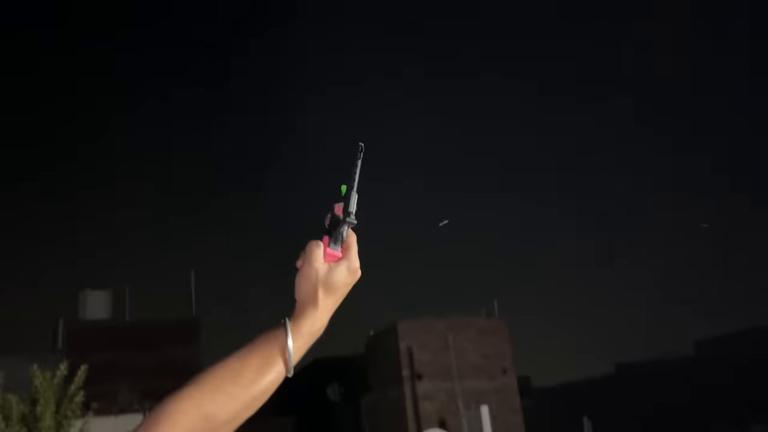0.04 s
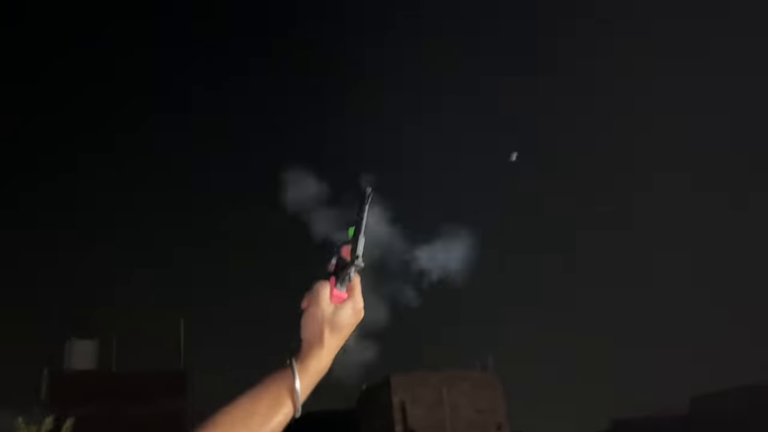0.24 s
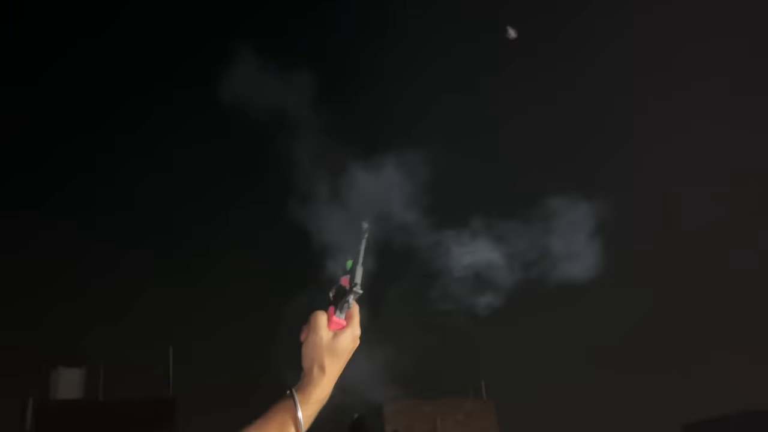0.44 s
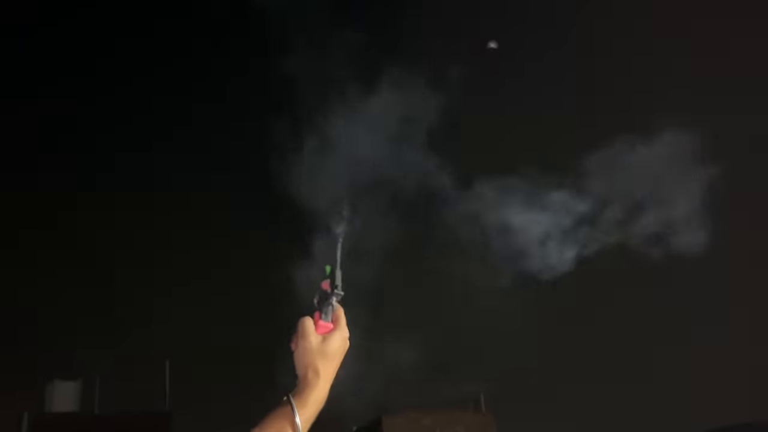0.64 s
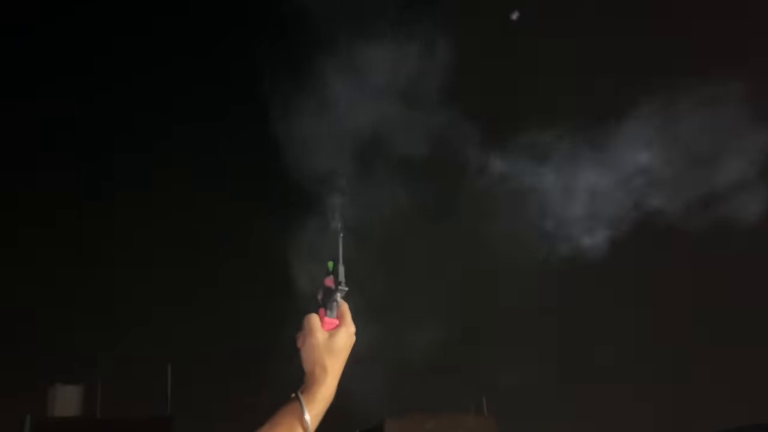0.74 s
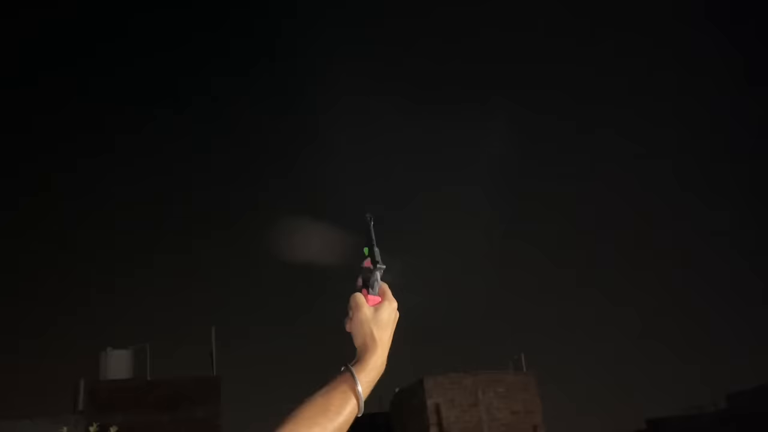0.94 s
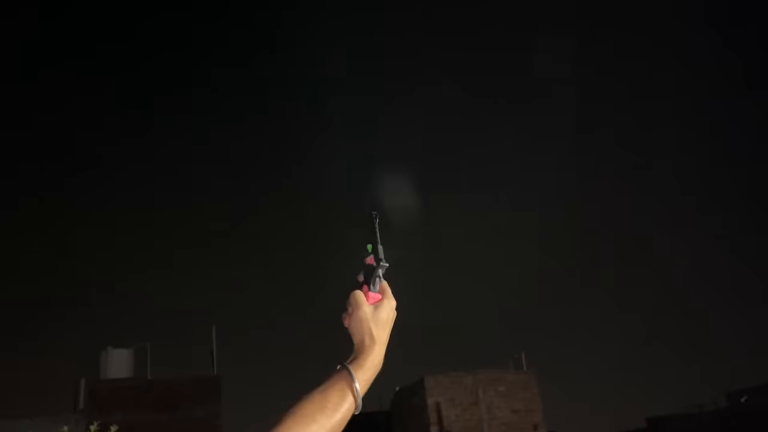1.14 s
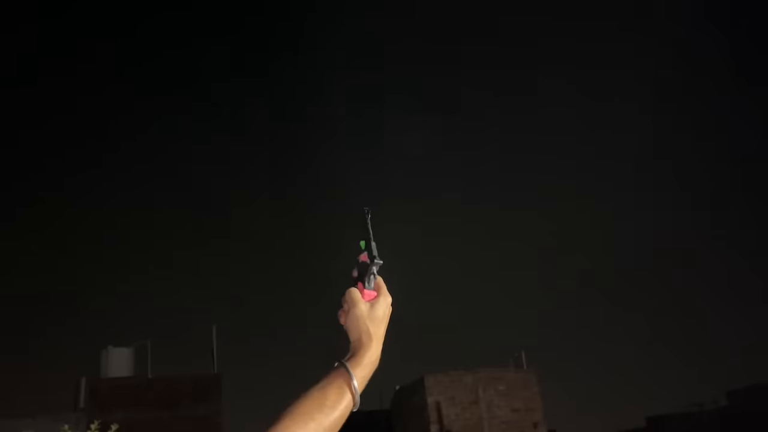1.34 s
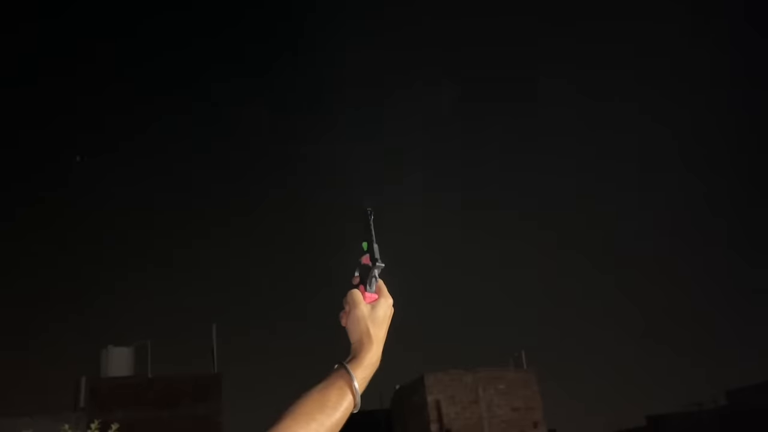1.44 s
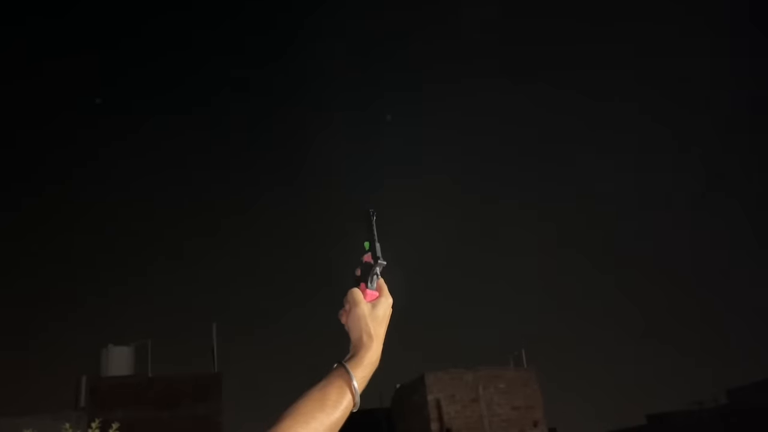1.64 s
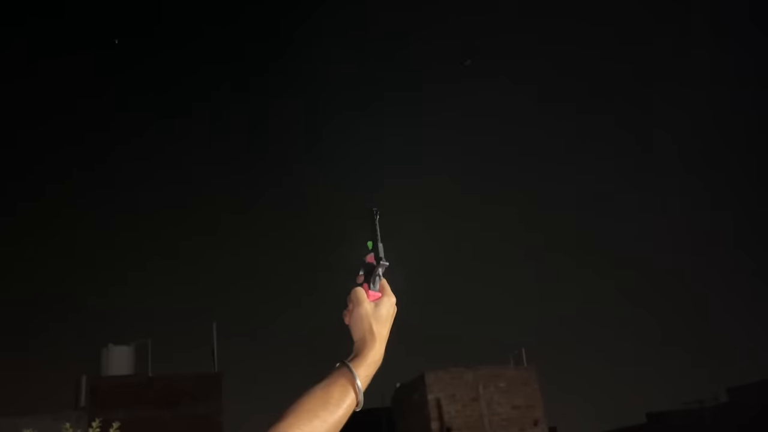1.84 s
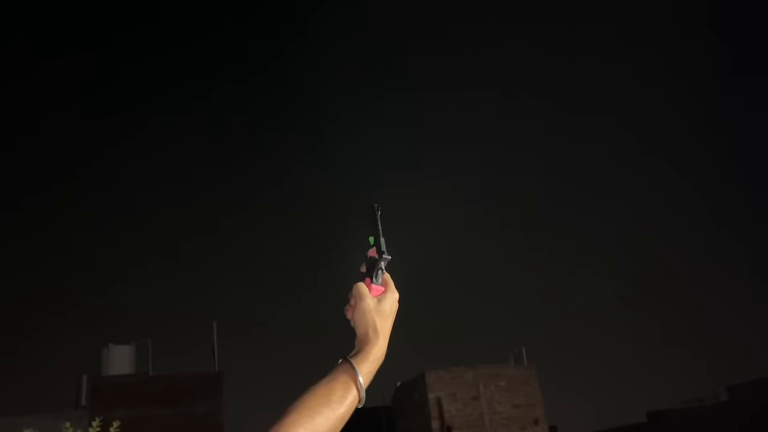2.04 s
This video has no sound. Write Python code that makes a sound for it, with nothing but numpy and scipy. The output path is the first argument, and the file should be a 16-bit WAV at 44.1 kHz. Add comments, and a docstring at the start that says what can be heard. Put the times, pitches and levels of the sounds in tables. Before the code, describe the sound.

A toy cap gun fires one very loud crack after a brief soft hiss, echoes scatter off houses, then the hammer rattles softly, the trigger ticks and two dry snaps follow; close microphone, faint street rumble.

```python
"""A soft hiss fades, then a toy cap gun held up over rooftops at night fires one cap that echoes off the houses.
The hammer is let down softly, then snaps on spent caps, with trigger ticks around it; a street rumbles far below.
Noise bursts, struck body tones and decaying echo noise build the gun; coloured noise makes hiss and street.
The recorder turns its gain down at the blast and creeps back; once the sound dips briefly to near silence."""
import sys
import numpy as np
from scipy import signal
from scipy.fft import rfft, irfft, next_fast_len
from scipy.io import wavfile
from scipy.ndimage import uniform_filter1d, minimum_filter1d, map_coordinates

SR = 44100
rng = np.random.default_rng(int(sys.argv[2]) if len(sys.argv) > 2 else 0)


def volts_from_decibels(level):
    """Turn decibel levels (scalar or array-like) into linear amplitude factors."""
    exponent = np.asarray(level, float) / 20
    return 10 ** exponent


def generate_wav(signal):
    """Clip the signal to [-1, 1] and save it as 16-bit WAV at the path in sys.argv[1]."""
    frames = np.transpose(np.atleast_2d(signal))
    scaled = np.clip(frames, -1, 1) * 32767
    pcm = np.round(scaled).astype(np.int16)
    wavfile.write(sys.argv[1], SR, pcm)


N = 92610
T = np.arange(N) / SR
BLAST_S = 0.2172
# decay of the roof and nearest walls: (frequency [Hz], time to fall 60 dB [s])
NEAR_DECAY = [(500, 0.13), (2000, 0.068), (8000, 0.074), (15000, 0.11)]
# decay of the town: (frequency [Hz], time to fall 60 dB [s])
FAR_DECAY = [(500, 0.79), (2000, 0.77), (5000, 0.79), (9000, 0.6), (15000, 0.41)]


def unit(x):
    """Scale to rms 1."""
    return x / np.sqrt(np.mean(x ** 2) + 1e-20)


def along(points, hz):
    """Read a curve of (Hz, value) points on a log frequency axis."""
    f, v = np.transpose(points)
    return np.interp(np.log(hz + 1), np.log(f + 1), v)


def filtered(x, response):
    """Multiply the spectrum of x by a function of frequency."""
    m = next_fast_len(len(x) + 8192)
    spectrum = rfft(x, m) * response(np.fft.rfftfreq(m, 1 / SR))
    return irfft(spectrum, m)[:len(x)]


def coloured(tone):
    """Noise of rms 1 with the given spectrum."""
    return unit(filtered(rng.standard_normal(N), lambda f: volts_from_decibels(along(tone, f))))


def peak(f, hz, width_hz):
    """Response of one causal resonance."""
    return 1j * f * width_hz / (hz * hz - f * f + 1j * f * width_hz + 1e-9)


def burst(start, length):
    """Envelope with a quick rise, its decay 30 dB down after length."""
    t = np.clip(T - start, 0, None)
    rise_s = 0.09 * length
    return (1 - np.exp(-t / rise_s)) * volts_from_decibels(-30 * t / length)


def clicks(rows, length):
    """Short noise bursts, each through its own band."""
    out = np.zeros(N)
    for s, db, hz, width_hz in rows:
        noise = rng.standard_normal(1024) * burst(0, length)[:1024]
        click = filtered(noise, lambda f: peak(f, hz, width_hz) ** 3)
        i = round(s * SR)
        # equal energy for every click before its level
        out[i:i + 1024] += volts_from_decibels(db) * click / np.linalg.norm(click) * np.sqrt(length * SR / 20)
    return out


def pulses(rows, tone):
    """Single coloured impulses at (s, dB)."""
    x = np.zeros(N)
    for s, db in rows:
        x[round(s * SR)] = volts_from_decibels(db)
    return filtered(x, lambda f: volts_from_decibels(along(tone, f)))


def space(x, t60):
    """Diffuse echoes; each frequency dies at its own speed."""
    hz, t, z = signal.stft(rng.standard_normal(SR), SR, nperseg=256)
    decay = volts_from_decibels(-60 * t / along(t60, hz)[:, None])
    tail = signal.istft(z * decay, SR, nperseg=256)[1]
    return signal.fftconvolve(x, tail / np.linalg.norm(tail))[:N]


def street():
    """Distant traffic rumble as slightly unsteady noise, a wavering low hum and a faint thin squeak."""
    # rumble spectrum: (frequency [Hz], density [dB per Hz, relative])
    rumble_tone = [(25, -58), (52, 0.5), (145, -2.5), (906, -13.5), (1200, -12), (1370, -13.5), (1970, -24),
                   (3210, -19.5), (4060, -43.5), (12000, -74), (15600, -101), (22000, -120)]
    # hum bands: (centre [Hz], resonance width [Hz], level [dB])
    hum_bands = [(60.7, 6, -57.5), (123.5, 32, -60.5)]
    # squeak: (time [s], length [s], pitch [Hz], level [dB])
    squeaks = [(1.306, 0.31, 3150, -62)]
    level_db, wobble_db = -53, -2.5
    wobble = map_coordinates(rng.standard_normal(30), [T * 9])  # 9 random points a second
    rumble = volts_from_decibels(level_db + wobble_db * wobble) * coloured(rumble_tone)
    hum = np.zeros(N)
    for hz, width_hz, db in hum_bands:
        hum += volts_from_decibels(db) * unit(filtered(rng.standard_normal(N), lambda f: peak(f, hz, width_hz) ** 2))
    squeak = np.zeros(N)
    for s, length, hz, db in squeaks:
        swell = np.sin(np.pi * np.clip((T - s) / length, 0, 1))
        squeak += volts_from_decibels(db) * swell * np.sin(2 * np.pi * hz * T + 3 * wobble)
    return rumble + hum + squeak


def hiss():
    """A soft noise hiss that fades and stops at the blast."""
    # fade: (time [s], level [dB])
    fade = [(0.0, -39), (0.024, -47), (0.175, -55)]
    # spectrum: (frequency [Hz], density [dB per Hz, relative])
    hiss_tone = [(350, -10.5), (600, -12.5), (2070, -13), (2680, -14), (3480, -18), (9490, -23),
                 (16000, -44)]
    s, db = np.transpose(fade)
    return volts_from_decibels(np.interp(T, s, db)) * (T < BLAST_S) * coloured(hiss_tone)


def trigger():
    """Small ticks of trigger and cylinder: band-shaped noise bursts with a little near echo."""
    # ticks: (time [s], level [dB], centre [Hz], resonance width [Hz])
    tick_rows = [(1.0892, -29, 2150, 1510), (1.094, -31.5, 4620, 3140), (1.120, -39, 2090, 1500),
                 (1.161, -31.5, 3620, 3280), (1.170, -25.5, 3500, 11350), (1.329, -45, 2930, 1209),
                 (1.399, -37, 5500, 9100), (1.5352, -25.5, 2210, 1800), (1.545, -30, 3940, 3040),
                 (1.5975, -19, 4120, 11800), (1.7207, -35, 3140, 2980), (1.778, -41, 4600, 5920),
                 (1.9098, -28, 2180, 1870), (1.9787, -20, 3870, 11000), (2.0475, -39.5, 2920, 1970)]
    length_s, room_db = 0.006, -13
    ticks = clicks(tick_rows, length_s)
    return ticks + volts_from_decibels(room_db) * space(ticks, NEAR_DECAY)


def hammer(ticks):
    """Quick contacts crack and ring the plastic body; a soft fall rattles thinly; ticks ring it too."""
    # hammer falls: (time [s], level [dB])
    snaps = [(1.4162, -2.5), (1.7957, -1.5)]
    # contacts in one fall, then several later echoes off near walls:
    # (time after the fall [s], level [dB], length [s])
    contacts = [(-.0023, -22.5, 0.0049), (0, 0, 0.0079), (.0033, 1, 0.0069), (.0057, 0.5, 0.0035),
                (0.0145, -18.5, 0.0045), (0.023, -11.5, 0.014), (0.03, -19, 0.013), (.035, -17.5, 0.0078),
                (0.064, -23, 0.0082)]
    # hammer let down softly once: (time [s], level [dB], length [s])
    soft_fall = [(0.9864, -20.5, .008), (0.997, -21, 0.014), (0.997, -24.5, 0.0076), (1.03, -28, .01),
                 (1.042, -43.5, 0.0077)]
    # crack spectrum: (frequency [Hz], gain [dB])
    crack_tone = [(400, -53), (700, -19.5), (1040, 1.5), (1650, -9.5), (3420, 3.5), (3750, 1), (5190, 4.5),
                  (6340, -4), (7060, -1.5), (16000, -16.5)]
    # spectrum of soft rattle and echoes: (frequency [Hz], gain [dB])
    thin_tone = [(600, -31), (1100, -7), (2600, -3), (5000, -2), (10500, -5.5), (12000, -19.5),
                 (17000, -16)]
    # ringing body: (pitch [Hz], level [dB], time to fall 60 dB [s])
    body = [(995, -24.5, 0.035), (1190, -31, 0.038), (2643, -29.5, 0.117), (3455, -33.5, 0.23),
            (5017, -27, 0.069), (5290, -30, 0.047), (7260, -33, 0.11)]
    scrape_s, scrape_rise_s, scrape_t60_s, scrape_db = 0.9735, 0.004, 0.3, -37
    soft_echo_db = 8.5  # a long rattle feeds body and echoes more than its peak suggests
    rattle_ring_db = -27  # how much the crackle of a contact stirs the body
    near_db, far_db = 6.5, 3

    snap_env = sum(volts_from_decibels(db + d) * burst(s + lag, n) for s, db in snaps for lag, d, n in contacts)
    soft_env = sum(volts_from_decibels(db) * burst(s, n) for s, db, n in soft_fall)
    # the hammer dragged forward
    rise = np.clip((T - scrape_s) / scrape_rise_s, 0, 1)
    since_rise = np.clip(T - scrape_s - scrape_rise_s, 0, None)
    soft_env = soft_env + volts_from_decibels(scrape_db) * rise * volts_from_decibels(-60 * since_rise / scrape_t60_s)

    crackle = snap_env * rng.choice([-1., 1.], N)
    rattle = soft_env * rng.standard_normal(N)
    hits = filtered(crackle, lambda f: volts_from_decibels(along(crack_tone, f)))
    hits = hits + filtered(rattle, lambda f: volts_from_decibels(along(thin_tone, f)))

    t = T[:SR // 2]
    ring = sum(volts_from_decibels(db - 60 * t / t60) * np.sin(2 * np.pi * hz * t) for hz, db, t60 in body)
    soft_knocks = [(s, db + soft_echo_db) for s, db, n in soft_fall]
    knocks = [(s + lag, db + d) for s, db in snaps for lag, d, n in contacts] + soft_knocks
    strike = pulses(knocks, [(450, -26), (900, -0.5)]) + volts_from_decibels(rattle_ring_db) * (hits + 2 * ticks)
    ringing = signal.fftconvolve(strike, ring)[:N]

    pulse = pulses(snaps + soft_knocks, thin_tone)
    echoes = volts_from_decibels(near_db) * space(pulse, NEAR_DECAY) + volts_from_decibels(far_db) * space(pulse, FAR_DECAY)
    return hits + ringing + echoes


def cap():
    """A dull, band-limited noise swell leads into the crack; low air push and echoes follow."""
    # onset bursts: (time [s], level [dB], length [s])
    onset_bursts = [(0.1954, -24.5, 0.019), (0.2028, -7, 0.032), (0.2096, -5.5, 0.01), (0.2144, 12, 0.011)]
    # resonances of the onset: (centre [Hz], width [Hz], level [dB])
    onset_bands = [(716.5, 190, -3), (971, 210, -2), (1930, 600, -0.5), (3150, 290, -4.5)]
    # crack spectrum: (frequency [Hz], density [dB per Hz, relative])
    blast_tone = [(150, -72.5), (500, -37), (1000, 5), (2500, -2.5), (5000, -3), (10000, -12),
                  (16000, -23.5), (18000, -51)]
    # echoes off walls: (delay [s], level [dB], centre [Hz], resonance width [Hz])
    wall_rows = [(.0078, 20, 2950, 14000), (.0186, -13, 2930, 15450), (.0197, 18, 2880, 15450),
                 (.026, 13, 2435, 9200), (.0316, 19, 3760, 20000), (.047, -21, 2500, 9720),
                 (.063, 9.5, 2440, 3500), (0.1251, 8.5, 3580, 3470), (0.148, 1, 3850, 3000),
                 (0.2126, 6, 3180, 4370), (0.332, -15.5, 7000, 5970), (.418, -25.5, 4970, 9000),
                 (0.453, -63, 7000, 8000)]
    # echo spectrum: (frequency [Hz], gain [dB])
    echo_tone = [(250, -16.5), (500, -9), (1000, -3), (2200, 2), (4500, -3), (10500, -10), (12000, -18.5),
                 (17000, -35)]
    treble_db = -17  # broad treble in the onset
    crack_len_s, crack_db = 0.00088, 27
    push_db, push_s, push_lag_s, push_low_hz = 20.5, 0.0008, 0.0034, 48
    small_count, small_span_s, small_db, small_spread_db = 70, 0.45, -3, 10
    wall_len_s = 0.0016
    swell_delay_s, swell_width_s, swell_db, swell_rough_db, swell_top_hz = 0.26, 0.11, -22.5, 2.5, 7000
    near_lag_s = 0.018  # delay before the dense near echoes begin
    near_db, far_db = 36, 31.5

    def onset_response(f):
        return sum(volts_from_decibels(db) * peak(f, hz, width_hz) ** 3 for hz, width_hz, db in onset_bands)

    dull = unit(filtered(rng.standard_normal(N), onset_response))
    bright = coloured(blast_tone)
    onset_env = sum(volts_from_decibels(db) * burst(s, n) for s, db, n in onset_bursts)
    onset = (dull + volts_from_decibels(treble_db) * bright) * onset_env
    crack = bright * burst(BLAST_S, crack_len_s)
    crack = volts_from_decibels(crack_db) * crack / np.abs(crack).max()

    u = np.clip(T - BLAST_S - push_lag_s, 0, None) / push_s
    push = filtered(volts_from_decibels(push_db) * u * np.exp(-u), lambda f: (1j * f / (push_low_hz + 1j * f)) ** 4)

    # ledges and chimneys: many small scattered echoes, weaker when later
    small = []
    for lag, size, pitch in rng.random((small_count, 3)):
        db = small_db - small_spread_db * (2 * lag + size)
        small.append((lag * small_span_s, db, 1500 * 5 ** pitch, 2500))
    walls = clicks([(BLAST_S + s, db, hz, w) for s, db, hz, w in wall_rows + small], wall_len_s)

    # a far row of houses answers as a rough swell
    rough = map_coordinates(rng.standard_normal(500), [T * 200])
    hump = np.exp(-((T - BLAST_S - swell_delay_s) / swell_width_s) ** 2 / 2)
    far_noise = filtered(coloured(echo_tone), lambda f: 1 / (1 + (f / swell_top_hz) ** 4))
    swell = volts_from_decibels(swell_db + swell_rough_db * rough) * hump * far_noise

    pulse = pulses([(BLAST_S, 0)], echo_tone)
    late_pulse = np.roll(pulse, round(near_lag_s * SR))
    wash = volts_from_decibels(near_db) * space(late_pulse, NEAR_DECAY) + volts_from_decibels(far_db) * space(pulse, FAR_DECAY)
    return onset + crack + push + walls + wash + swell


def scene():
    """Street, hiss and cap dip briefly, where the blast's echoes end; hammer and ticks stay undipped."""
    dip_start_s, dip_end_s, return_s, dip_db = 0.948, 0.974, 0.012, -28
    fall = np.clip((T - dip_start_s) / (dip_end_s - dip_start_s), 0, 1)
    recovery = np.clip((T - dip_end_s) / return_s, 0, 1)  # the street comes back
    dip = volts_from_decibels(dip_db * (fall - recovery))
    ticks = trigger()
    behind = street() + hiss() + cap() * (T < dip_end_s)
    return (dip * behind + hammer(ticks) + ticks)[None]


def low_pass(x):
    """Removes everything above the highest recorded frequency."""
    return signal.sosfilt(signal.butter(12, 16990, fs=SR, output="sos"), x)


def record(dry):
    """Gain control drops fast, holds and creeps back; then a treble limit and rounded clipping."""
    limit_db, ahead_s, hold_s, release_db_per_s = 3, 0.00082, 0.17, 48
    top_hz, clip = 16900, 0.93
    need_db = np.minimum(0, limit_db - 20 * np.log10(np.abs(dry[0]) + 1e-9))
    ahead, hold = round(ahead_s * SR), round(hold_s * SR)
    # lowest gain needed from hold ago to slightly ahead
    span = hold + ahead
    held_db = minimum_filter1d(np.pad(need_db, (hold, ahead)), span, origin=0)[span // 2:][:N]
    back_db = release_db_per_s * T
    gain_db = np.minimum.accumulate(held_db - back_db) + back_db
    gain_db = uniform_filter1d(gain_db, ahead)
    x = filtered(dry[0] * volts_from_decibels(gain_db), lambda f: f < top_hz)
    mix = x / (1 + np.abs(x / clip) ** 4) ** (1 / 4)
    return low_pass(mix[None])


dry = scene()
out = record(dry)
generate_wav(out)
```